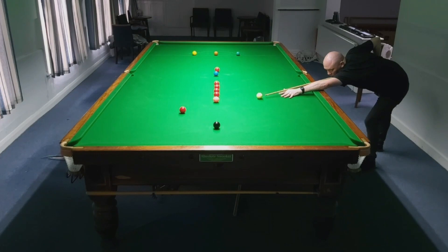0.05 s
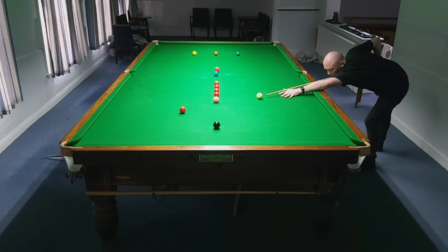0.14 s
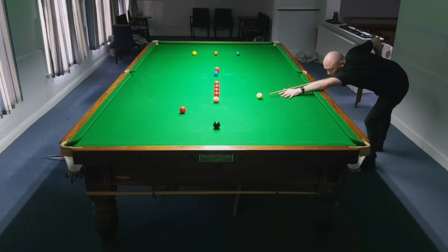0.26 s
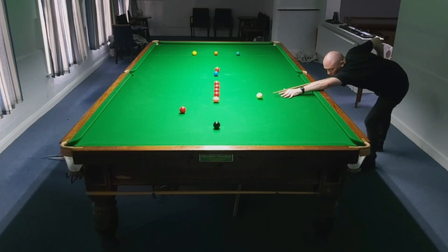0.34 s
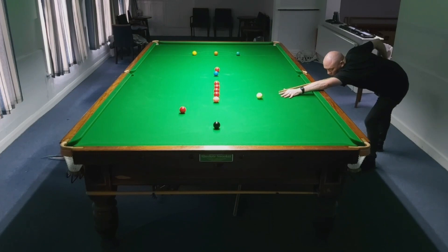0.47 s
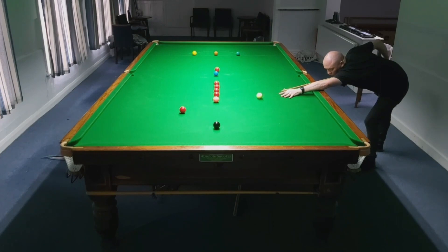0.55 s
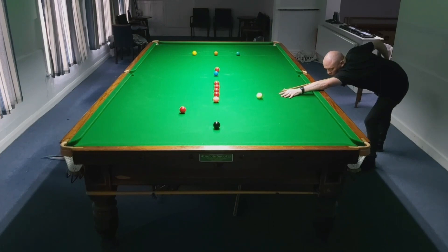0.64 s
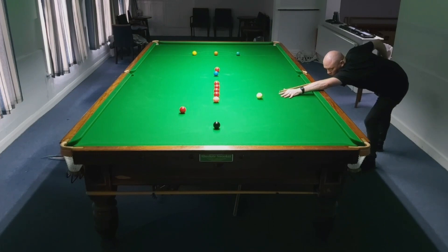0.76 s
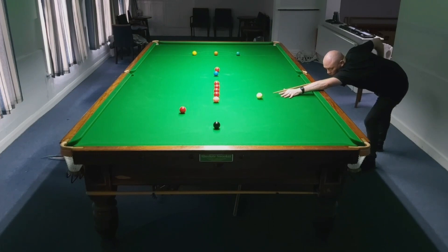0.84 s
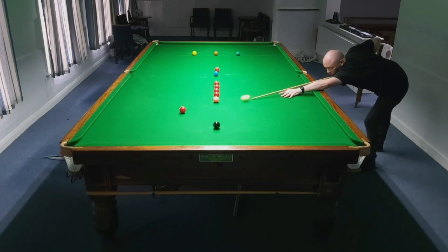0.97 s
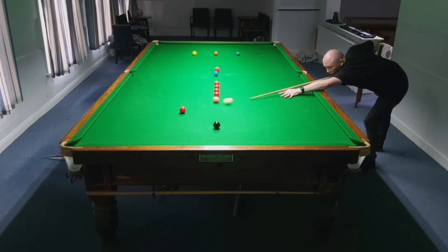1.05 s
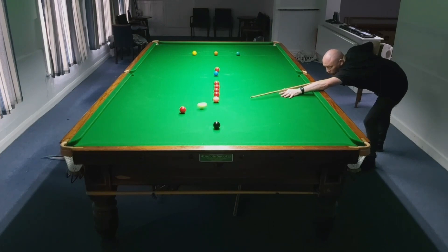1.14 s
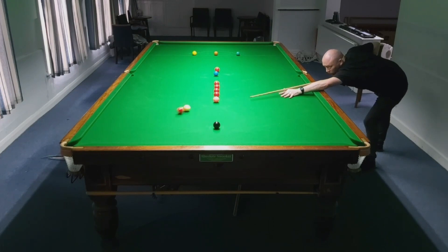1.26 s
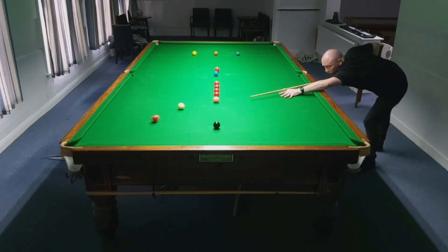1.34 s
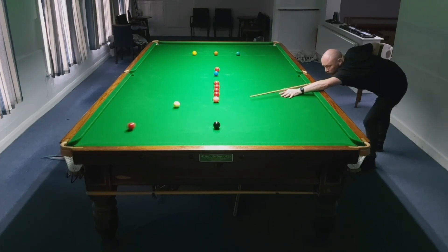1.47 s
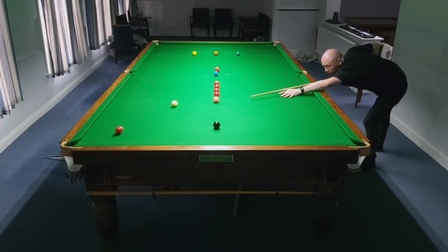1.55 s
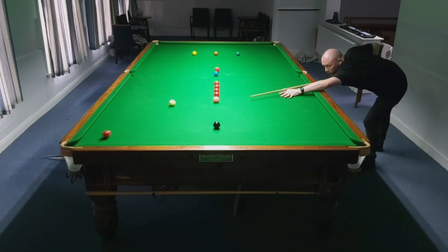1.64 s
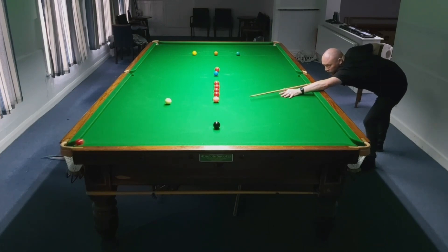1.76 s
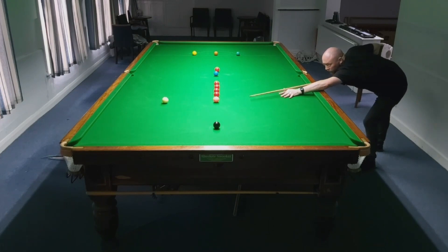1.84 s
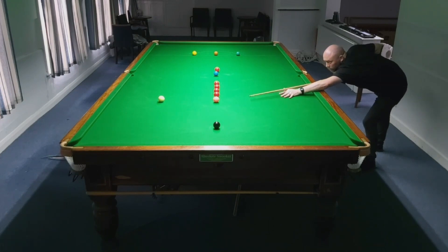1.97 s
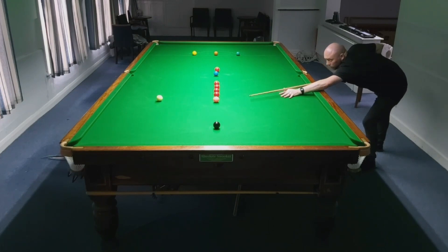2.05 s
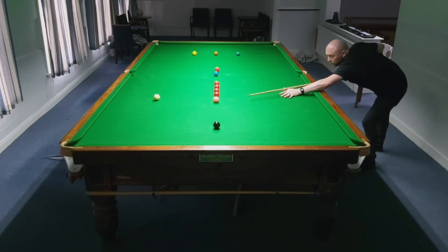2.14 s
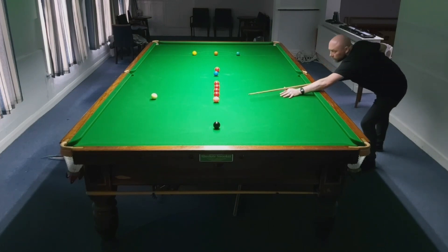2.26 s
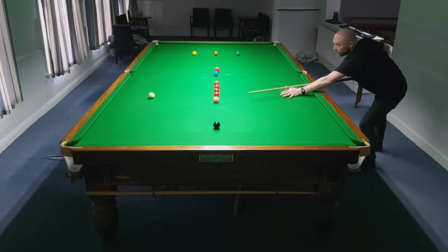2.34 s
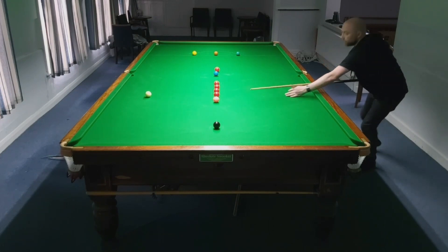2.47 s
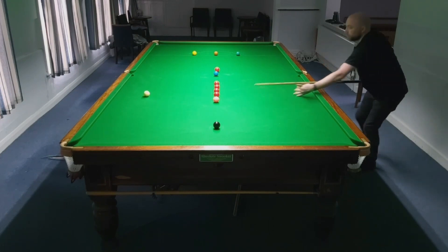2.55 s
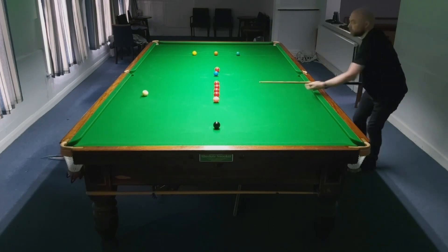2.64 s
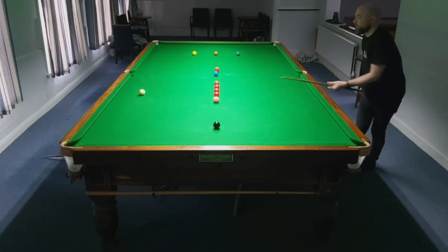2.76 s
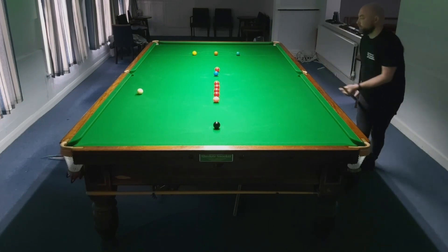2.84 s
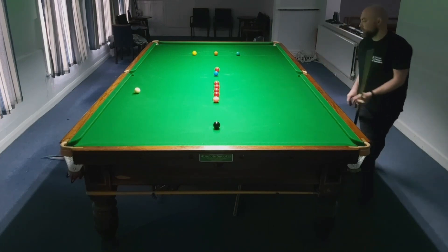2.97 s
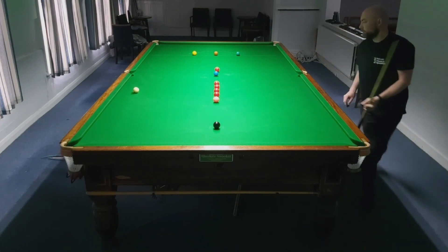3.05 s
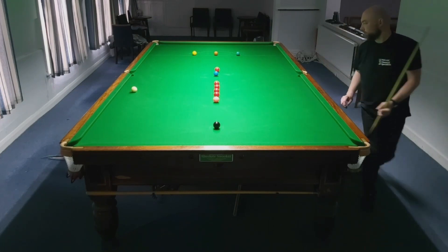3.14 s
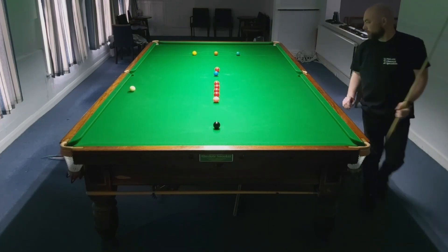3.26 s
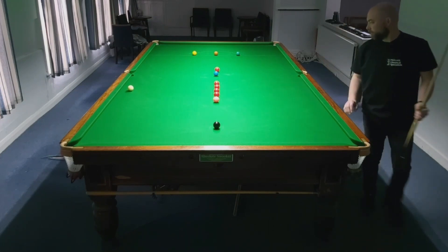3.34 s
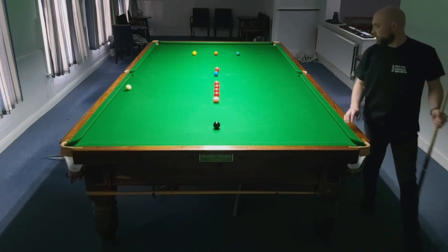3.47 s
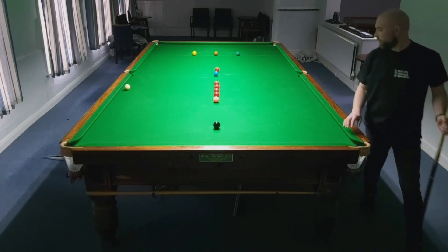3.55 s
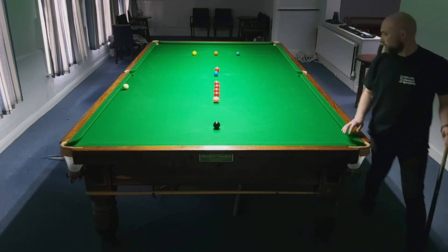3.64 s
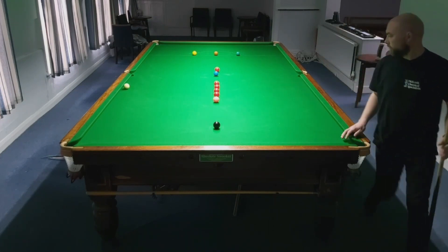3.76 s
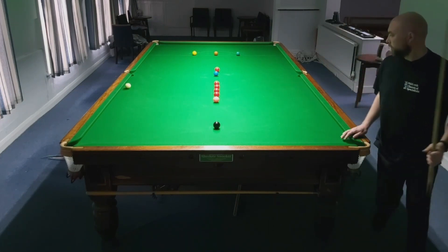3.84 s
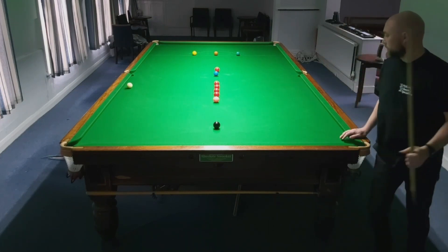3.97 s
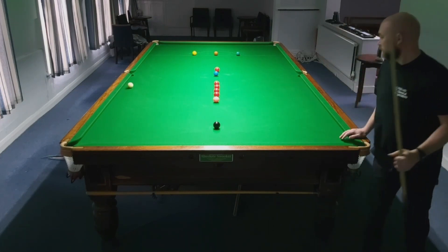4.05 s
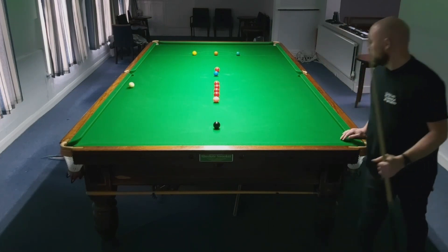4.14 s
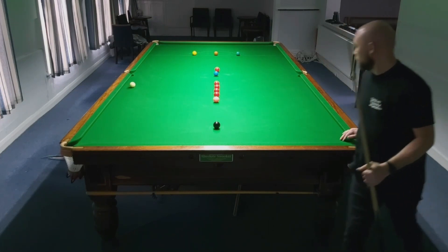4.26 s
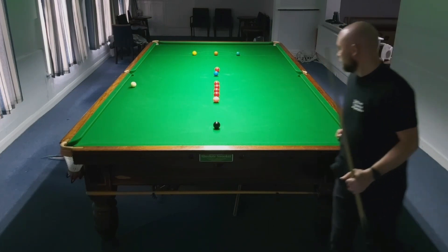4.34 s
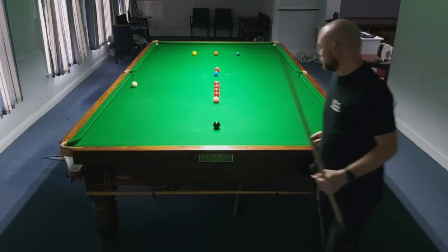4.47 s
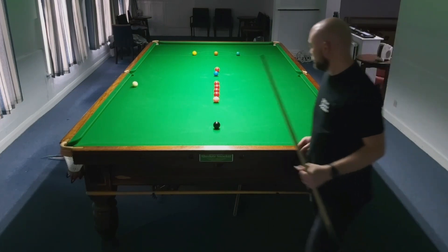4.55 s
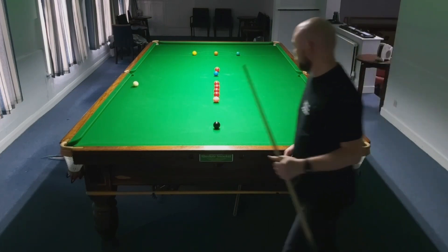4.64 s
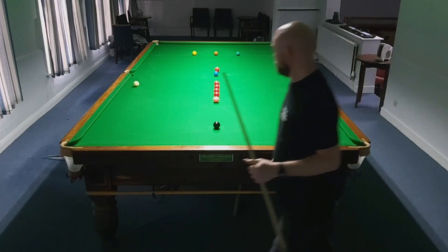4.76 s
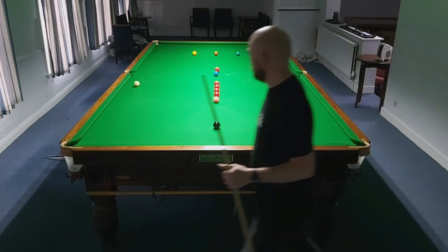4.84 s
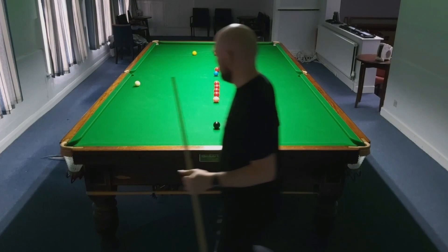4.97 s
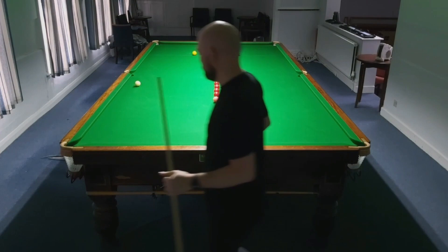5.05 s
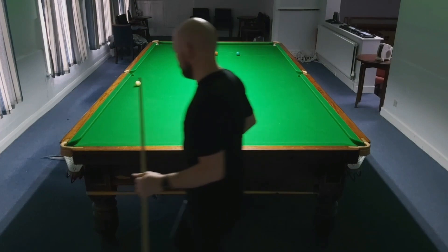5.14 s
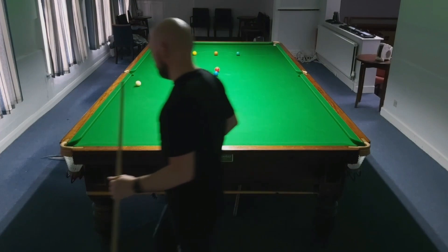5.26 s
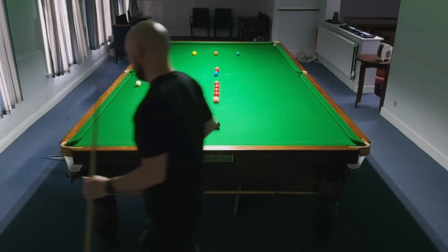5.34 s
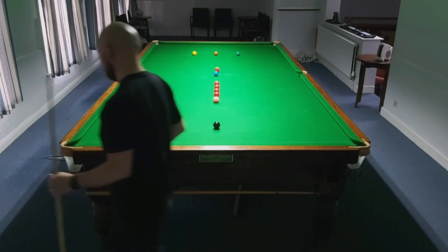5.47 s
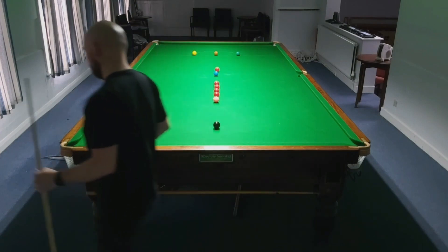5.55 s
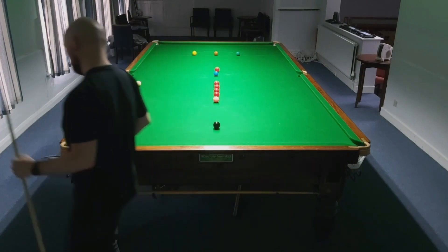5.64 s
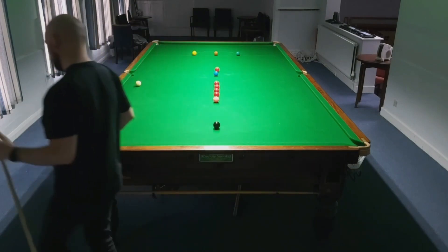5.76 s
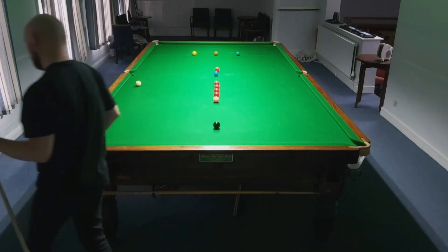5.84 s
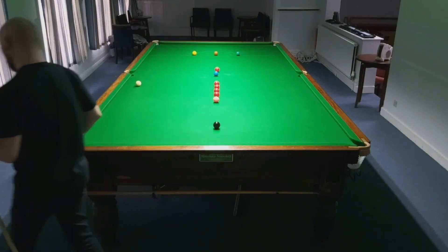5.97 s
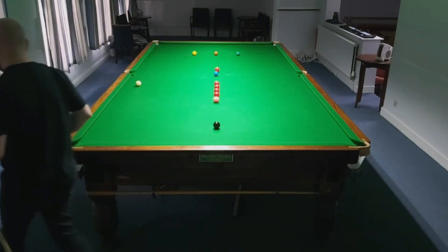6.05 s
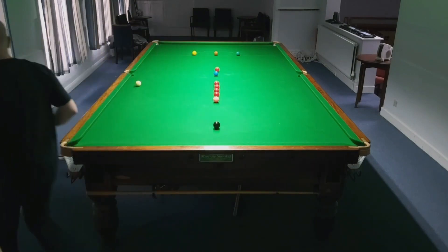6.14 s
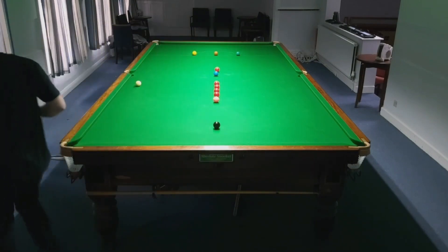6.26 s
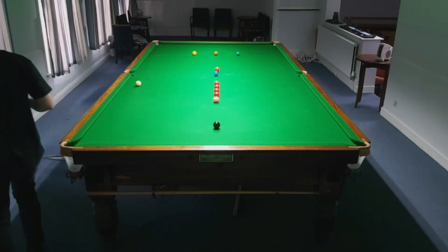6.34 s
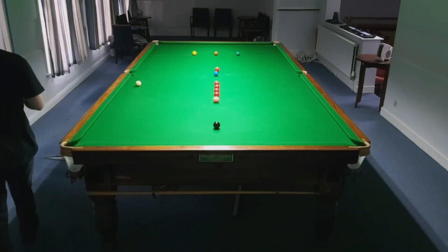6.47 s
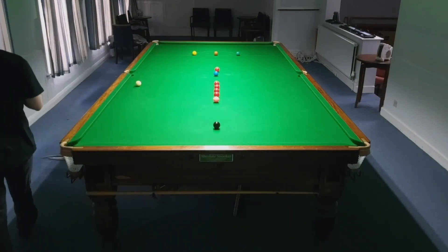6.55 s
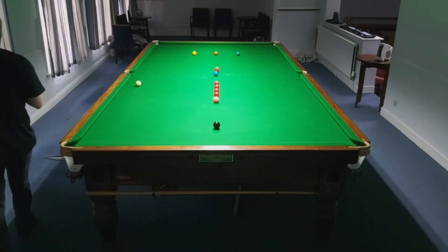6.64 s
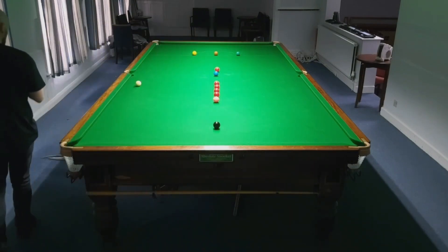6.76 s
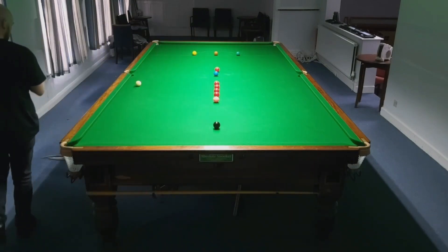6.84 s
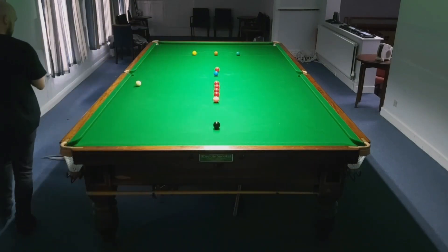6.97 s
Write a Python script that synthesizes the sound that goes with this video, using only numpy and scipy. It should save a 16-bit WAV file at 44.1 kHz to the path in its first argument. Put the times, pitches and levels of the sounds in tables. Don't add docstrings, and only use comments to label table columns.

```python
import sys
import numpy as np
from scipy import signal
from scipy.fft import rfft, irfft, next_fast_len
from scipy.io import wavfile
from scipy.ndimage import uniform_filter1d, minimum_filter1d, map_coordinates

SR = 44100
rng = np.random.default_rng(int(sys.argv[2]) if len(sys.argv) > 2 else 0)


def file_out(sig):
    cols = np.atleast_2d(sig).T
    lim = np.clip(cols, -1, 1)
    pcm = np.round(lim * 32767).astype(np.int16)
    wavfile.write(sys.argv[1], SR, pcm)


def invert_db(x):
    u = np.asarray(x, float) / 20
    return 10 ** u


N = 308690
SPAN = 32768
HZ = np.fft.rfftfreq(SPAN, 1 / SR)
SLOW_S, WALK_S = 1.1, 2.5

# start in seconds, peak level in dB, treble in dB.
CLACKS = [(1.0601, 0, 14), (1.0628, -9, 2), (1.0652, -10, 9), (1.0679, -1, 9), (1.0703, -3, 7),
          (1.0821, -4, 2), (1.0942, -2, -8), (1.1759, 0, 0), (1.1772, -8, 10), (1.1934, -3, -8),
          (1.1957, -1, -8), (2.2338, -16, -10)]
# time in seconds, level in dB, treble in dB.
CLACK_ROOM = [
    (1.068, 4, 2.5),
    (1.184, 7, -2),
    (2.2312, -21.5, 2),
]
# frequency in Hz, level in dB per Hz.
BALL = [(180, -43), (300, -15.5), (600, -19.5), (900, -17.5), (1200, -6), (2400, 5.5), (3500, -1),
        (5000, -18.5), (6200, -29.5), (10800, -35.5), (15500, -39)]
LOBE_HZ, LOBE_DB = 3130, 2.5
FAST_LOBE_HZ, FAST_LOBE_DB = 5750, 9.5


def ball_pulses(s, db, treble_db, fast_db):
    fast_or_slow = np.where(s > SLOW_S, [[LOBE_HZ], [LOBE_DB]], [[FAST_LOBE_HZ], [fast_db]])
    null_hz, depth_db = fast_or_slow[..., None]
    lobes = -depth_db * np.cos(2 * np.pi * HZ / null_hz) * np.clip(HZ / null_hz - 1, 0, 1)
    treble = treble_db[:, None] * along([(4500, 0), (6500, 1), (14000, 1)], HZ)
    pulse = causal(along(BALL, HZ) + lobes + treble)
    peak = np.abs(irfft(pulse)).max(axis=1, keepdims=True)
    return pulse / peak * invert_db(db)[:, None]


def clacks():
    s, db, treble_db = np.transpose(CLACKS)
    sharp = placed(s, ball_pulses(s, db, treble_db, FAST_LOBE_DB), 0 * s - 60, onset=0.001)
    s, db, treble_db = np.transpose(CLACK_ROOM)
    tail = placed(s - 0.022, ball_pulses(s, db - 60, treble_db, 0), 60 + 0 * s, onset=0.026)
    return sharp + tail


# start in seconds, peak level in dB, pitch in
# Hz.
CLACK_RINGS = [(1.0604, -3, 2750), (1.0660, -11, 2500), (1.0672, -10, 3300), (1.0686, -4, 2500),
               (1.0710, -6, 2400), (1.0805, -12, 2700), (1.0830, -12, 2900), (1.0882, -12, 2800),
               (1.0908, -12, 2800), (1.0965, -12, 2000), (1.1025, -12, 2600), (1.1108, -11, 2600),
               (1.1780, -9, 2600), (1.1800, -13, 2900), (1.1822, -6, 2500), (1.1845, -12, 2400),
               (1.1872, -10, 2800), (1.1918, -10, 2800), (1.1943, -8, 2800), (1.1980, -9, 1900),
               (1.2000, -8, 2300), (1.2073, -9, 2400), (1.2193, -11, 2500)]


def rings():
    cycles = 2.2
    return pings([(*row, cycles) for row in CLACK_RINGS], size=1024)


# frequency in Hz, width in Hz, level in dB.
CUE = [(1645, 60, -1), (2770, 120, 3), (3680, 310, -1.5), (4420, 240, -3.5), (4950, 160, -4.5),
       (5800, 220, -5.5), (6900, 220, -6), (8080, 250, -7.5), (10500, 1200, -13)]
# start in seconds, level in dB, room in dB.
CUE_HITS = [
    (.786, -1.5, 4),
    (.8738, 11.5, -3.5),
]


def cue():
    return struck(CUE_HITS, resonances(CUE) ** 2, swell=0.002, t60=0.02)


# start in seconds, peak level in dB, pitch in Hz, room in dB.
TABLE_THUDS = [(0.787, -25.5, 210, 2), (0.799, -17.5, 437, -2), (0.879, -13, 348, -1.5),
               (0.949, -20, 290, 9.5), (1.04, -17.5, 182, 0.5), (1.538, -20.5, 450, -13),
               (1.5483, -9, 368, -6.5), (1.5538, -3, 363, 0), (1.584, -11, 402, -5.5),
               (1.609, -9.5, 378, 0.5), (1.662, -17.5, 285, -1.5), (1.97, -19.5, 242, -3)]
HEELS = [(0.018, -35, 88, 1.5), (0.049, -31.5, 119, -17), (2.82, -32.5, 173, 0), (2.97, -34.5, 322, 0),
         (3.334, -32.5, 127.8, -5), (3.435, -17.5, 181, -6), (3.664, -30, 374, -15),
         (3.964, -38.5, 107.3, -5), (4.05, -18, 133, -27), (4.137, -19, 163, 0), (4.198, -23.5, 262, -26),
         (4.407, -25, 120, -26), (4.425, -17, 298, -28), (4.541, -21.5, 140, -1), (4.642, -25, 98, -22),
         (4.66, -16.5, 142, -3.5), (4.717, -41, 125, -12), (4.818, -32, 206, -1), (4.974, -28.5, 142, 2),
         (5.123, -12, 270, -1), (5.246, -23, 140, -6), (5.337, -36, 302, -13), (5.722, -22.5, 103, -17),
         (5.836, -22, 178, 2), (5.874, -16.5, 304, 1), (6.436, -17, 326, -6.5), (6.45, -21.5, 160, -12),
         (6.754, -30, 300, 2)]


def thuds():
    s, db, hz, room_db = np.transpose(TABLE_THUDS + HEELS)[..., None]
    cycles = np.arange(SPAN) / SR * hz
    push = np.sin(2 * np.pi * cycles) * (1 - np.exp(-cycles / 0.34)) * np.exp(-cycles / 1.28)
    radiation = (1j * HZ / (0.46 * hz + 1j * HZ)) ** 2
    return placed(s[:, 0] + 0.003, rfft(push) * radiation * invert_db(db + 4), room_db[:, 0] - 1.5, onset=0.0081)


# start in seconds, peak level in dB, low end in dB, hardness in dB, room in dB.
RAIL_KNOCKS = [(0.7883, -13, 0.5, -14, -7.5), (0.7926, -22.5, -15, 1, -6), (1.662, -32.5, -5, -2.5, -3.5),
               (1.7885, -32.5, -21, 0.5, 10.5), (1.8908, -37.5, -2.5, 0.5, 9), (2.3165, -32.5, -9, -9, 5.5)]
STEP_KNOCKS = [(3.593, -40, -5, -1.5, 0), (4.14, -25.5, 2, -11.5, -0.5), (4.2072, -27, -7, 0, -4),
               (4.307, -25.5, -12, -8.5, 4.5), (4.314, -36, -17, -21, 7), (4.3342, -24, -3, -4, -17),
               (4.3481, -25.5, -5, -1, -4.5), (4.36, -29, -3, -6, -23), (4.412, -20, -3, -12, -24),
               (4.5427, -27, -9, -6.5, -1), (4.697, -27, -5, -11, -6.5), (4.819, -22, -6, -13, -2.5),
               (4.844, -27, -6, -41, 2), (4.8757, -31.5, -1.5, -5.5, -2.5), (4.977, -24.5, -22, -7.5, -4.5),
               (5.4773, -22.5, -28.5, -21, -4.5), (5.5232, -32, -12, -10, -2.5),
               (5.6238, -27, -6, -26, -10), (5.7113, -26, 5.5, -13, -4.5), (5.856, -26.5, -5, -23, -16),
               (5.891, -23, -12, -17.5, -2.5), (6.436, -23, -3.5, -20, -2), (6.756, -31, -6, -24, 5)]
TABLE_SCUFFS = [(0.7854, -20.5, -11.5, -15, 3.5), (0.876, -15.5, -14.5, 0, 4.1), (1.541, -39, 14, -36, 8.5),
                (1.587, -18.5, -1, -43, 2), (1.6052, -18, -6.5, -38, 4), (1.9929, -19, -19, -12.5, 6.6),
                (1.996, -34, -31, 16, 1.9)]
STEP_SCUFFS = [(2.673, -43, -9, -16.5, 2.5), (2.9062, -45.5, -13, -14, 7), (2.96, -67, -5, 5, 21),
               (3.3911, -50.5, -11, -34.5, 0), (3.5571, -48, -3, -8, 5), (3.669, -48.5, 7.5, -14, -4),
               (4.066, -38.5, -5.5, -6.5, 3.5), (4.671, -29.5, -29, -11, -0.5),
               (4.722, -28.5, 2, -5.5, -1.5), (5.1259, -43, -10, 4.5, 6), (5.168, -44, -23, -10, 10),
               (5.268, -37, -17, -16, -4), (5.3191, -51, 3, -6.5, 11), (5.346, -39.5, -3, -12, -2),
               (5.6094, -40, -20, -27, 10), (5.72, -41.5, 8, 3, -3), (6.4266, -34.5, -7, -23.5, -6)]
CHATTER = 8192
TOP_GROWS, TABLE_TOP_DB, FLOOR_TOP_DB = 1.2, -14, -21
AIRY_GROWS, TABLE_AIRY_DB, FLOOR_AIRY_DB = 2.2, -19, -31


def knocks():
    t = np.arange(CHATTER) / SR
    rigid, yielding = RAIL_KNOCKS + STEP_KNOCKS, TABLE_SCUFFS + STEP_SCUFFS
    hard = 0.16 * rng.standard_normal((len(rigid), CHATTER)) * invert_db(-60 * t / 0.063) + (t == 0)
    soft = 0.3 * rng.standard_normal((len(yielding), CHATTER)) * invert_db(-60 * t / 0.046)
    soft = soft * (1 - np.exp(-t / 0.00025))
    hard_top = np.repeat([TABLE_TOP_DB, FLOOR_TOP_DB], [len(RAIL_KNOCKS), len(STEP_KNOCKS)])
    soft_top = np.repeat([TABLE_TOP_DB, FLOOR_TOP_DB], [len(TABLE_SCUFFS), len(STEP_SCUFFS)])
    return contacts(rigid, hard, hard_top) + contacts(yielding, soft, soft_top)


def contacts(rows, force, top_db):
    s, db, low, hardness, room_db = np.transpose(rows)
    airy_db = np.where(s < WALK_S, TABLE_AIRY_DB, FLOOR_AIRY_DB)
    shapes = []
    for a, b, top, airy in zip(low, hardness, top_db, airy_db):
        points = [(50, a - 28), (900, a + 8), (2600, 0.01), (4200, 0.56 * b), (6000, b - 2),
                  (11500, TOP_GROWS * b + top), (16000, AIRY_GROWS * b + top + airy)]
        shapes.append(along(points, HZ))
    colours = causal(np.array(shapes)) * invert_db(db + 13.0)[:, None]
    return placed(s, colours, room_db + 0.5, onset=0.0026, force=rfft(force, SPAN))


# start in seconds, peak level in dB, contact in ms, room in dB.
TAPS = [
    (4.412, -2, 0.12, -5.5),
    (4.4198, -5, 0.12, -11),
    (4.5428, -5, 0.18, -1.5),
    (4.55, -6, 0.14, -33),
]


def taps():
    s, db, ms, room_db = np.transpose(TAPS)[..., None]
    u = np.arange(SPAN) / SR * 1000 / ms - 2
    push = rfft(np.exp(-u ** 2)) * 1j * HZ / (350 + 1j * HZ) * invert_db(db - 5.0)
    return placed(s[:, 0], push, room_db[:, 0], onset=0.0007)


# frequency in Hz, width in Hz, level in dB.
RAIL = [(7400, 900, 0), (11200, 500, -7)]
# start in seconds, level in dB, room in dB.
RAIL_HITS = [
    (1.592, -40, 0),
]
# frequency in Hz, width in Hz, level in dB.
RODS = [(2700, 80, -1), (3400, 110, -2), (4220, 90, -2), (5200, 200, -6)]
# start in seconds, level in dB, room in dB.
ROD_HITS = [
    (2.318, -19.5, 6),
]


def rail():
    hiss = struck(RAIL_HITS, resonances(RAIL) ** 2, swell=0.01, t60=0.15)
    return hiss + struck(ROD_HITS, resonances(RODS) ** 2, swell=0.00097, t60=0.026)


# start in seconds, peak level in dB, pitch in Hz, decay in cycles.
TICKS = [(.793, -22, 7960, 5), (.8745, -13, 2750, 8), (.875, -15.5, 4040, 8.6), (.8915, -19, 9700, 7.6),
         (2.2346, -24.5, 2460, 4.4), (2.511, -48, 701, 2.1), (1.5876, -19.5, 1060, 4.8),
         (1.5915, -27, 1960, 5.5), (1.613, -19.5, 1490, 6.4), (1.7897, -26, 4700, 7.8),
         (1.7905, -36, 6750, 12), (1.8899, -30, 4820, 10), (1.8905, -36, 7040, 10), (1.914, -36, 2000, 6.7),
         (1.9977, -14, 4600, 4.9), (1.999, -25, 6900, 10), (2.115, -30.5, 3140, 3.6),
         (4.0725, -38.5, 4600, 3.6), (4.208, -29.5, 6030, 4.3), (4.3068, -25, 2620, 2.3),
         (4.3145, -37, 2830, 2.7), (4.3143, -35, 7900, 3.3), (4.3345, -24, 3000, 2.8),
         (4.3485, -39, 7450, 4.8), (4.350, -33, 2820, 4), (4.360, -32, 5000, 4), (4.371, -38, 4740, 4.7),
         (4.676, -31, 3080, 3.2), (4.698, -41, 4830, 4), (4.7228, -26.5, 2870, 6.4),
         (4.7235, -28.5, 8400, 2.9), (4.727, -30, 1470, 2.8), (4.7668, -22, 1810, 1.7),
         (4.8205, -29, 1960, 3), (4.8445, -30, 2070, 3.4), (4.9775, -32, 3220, 3), (5.6244, -35, 1480, 3.8),
         (5.628, -33.5, 1900, 4), (5.7112, -25, 1530, 1.5), (5.712, -31, 6050, 4.3),
         (5.845, -34, 1010, 2.2), (5.892, -36.5, 4680, 5.6), (6.428, -43, 3230, 5.3),
         (6.4365, -28.5, 3280, 2.2), (6.532, -31, 3000, 1.2), (6.79, -44.5, 2000, 4.6)]
CLICKS = [(.879, -27, 2723, 100), (.88, -32.5, 4595, 130), (.922, -32.5, 1639, 49),
          (1.585, -21.5, 171.6, 4.4), (1.64, -21.5, 191, 3.8), (2.52, -67, 2700, 60),
          (2.545, -68.5, 3420, 70), (.905, -28, 9700, 8), (1.5445, -25, 447, 1.1), (1.597, -17, 1455, 6),
          (1.6065, -23, 1980, 6.6), (1.634, -22, 1480, 4), (1.651, -27, 1570, 4), (2.912, -46, 2500, 1.5),
          (3.392, -55, 2200, 4.4), (4.3068, -30, 5500, 1.5), (4.3142, -26, 5000, 1.5),
          (4.3218, -36, 4000, 1.5), (4.3372, -31, 2400, 2.3), (4.349, -30, 5000, 2),
          (4.382, -33, 2000, 1.5), (4.7245, -32, 4370, 3), (4.7668, -28, 4200, 1.2),
          (4.8765, -38, 5500, 1.5), (5.822, -22, 152, 1.5), (5.8455, -23, 495, 1.14),
          (5.856, -32, 1490, 1.3), (6.4362, -24, 870, 1.14), (6.443, -22.5, 210, 1.8),
          (6.537, -41, 1500, 4.1), (6.756, -20, 460, 1.04)]


def ticks():
    tick_room_db = -6.5
    direct = pings(TICKS, size=1024) + pings(CLICKS, size=6144) + keys()
    tail = irfft(answers(1, onset=0.0016)[0])
    return direct + invert_db(tick_room_db) * signal.fftconvolve(direct, tail)[:N]


# frequency in Hz, level in dB.
KEYS = [(6360, 0), (6910, -1), (7370, 2), (8190, 2), (8720, -3), (9800, -8), (10540, -3), (11300, -5),
        (11900, -9), (12730, -13), (13340, -17), (14590, -19)]
# start in seconds, level in dB, tilt in dB per octave.
JOLTS = [(5.126, -58, 1), (5.146, -62, 3), (5.165, -56, 10), (5.195, -61, 6), (5.262, -66, -2),
         (5.445, -71, 8), (5.477, -71, 4), (5.527, -64, 2), (5.722, -54, 7), (5.748, -59, 8),
         (5.895, -71, 1)]


def keys():
    t, out = np.arange(4096) / SR, np.zeros(N + SPAN)
    hz, level = np.transpose(KEYS)[..., None]
    t60 = 0.057
    for s, db, tilt in JOLTS:
        luck = rng.standard_normal((2, len(KEYS), 1))
        waver = np.cumsum(rng.standard_normal((len(KEYS), len(t))), axis=1) * 0.09
        ring_db = db + level + tilt * np.log2(hz / 8000) + 3 * luck[0] - 60 * t / t60
        ring = invert_db(ring_db) * np.sin(2 * np.pi * hz * (1 + 0.01 * luck[1]) * t + waver)
        out[round(s * SR):][:len(t)] += ring.sum(0) * (1 - np.exp(-t / 0.0026))
    return out[:N]


# start in seconds, hold in seconds, rumble in dB, scrape in dB over the rumble.
STROKES = [(0, 0.012, -58.5, -48), (0.901, 0.01, -29, 0.5), (1.009, 0.17, -31, -9),
           (1.245, 0.12, -40.5, -22.5), (1.704, 0.022, -37.5, -12), (1.828, 0.053, -37.5, -16),
           (2.017, 0.0086, -33.5, -25), (2.161, 0.11, -44, -3.5), (2.858, 0.033, -53, -6),
           (2.943, .06, -61, -7), (3.056, 0.041, -63.5, 2), (3.478, 0.033, -48, -9),
           (3.607, 0.075, -40, -24), (4.008, 0.07, -56, -3.5), (4.149, 0.014, -28.5, -34),
           (4.338, 0.093, -37.5, -6.5), (4.496, 0.081, -39, -25), (4.706, 0.11, -29.5, -17.5),
           (4.916, 0.17, -42.5, -5.5), (5.33, 0.034, -37, -14), (5.52, 0.024, -40.5, -9),
           (5.71, 0.011, -31.5, -7.5), (5.86, 0.046, -34, -18.5), (6.054, 0.054, -38, -25),
           (6.236, 0.079, -46.5, -18), (6.46, 0.034, -35, -26), (6.54, 0.15, -42.5, -13),
           (6.915, 0.095, -46, -22)]
# frequency in Hz, level in dB per Hz.
ROLL = [(50, -28.5), (90, -8), (160, -0.5), (300, -1.5), (400, -8), (700, -22.5), (910, -60), (1540, -120)]
# frequency in Hz, level in dB per Hz.
BOARDS = [(35, -31), (60, 0.5), (123, -2), (156, 0), (258, -6.5), (301, 1), (352, -9), (700, -19.5),
          (910, -67), (1540, -120)]
# frequency in Hz, level in dB per Hz.
SOLES = [(290, -29.5), (500, -6.5), (547, -9.5), (754, -13.5), (2080, -19), (3470, -24.5), (5500, -35.5),
         (7150, -67), (12100, -120)]
REST_DB = [-63, -58, -73.5, -85]


def strokes():
    s, hold, db, scrape_db = np.transpose(STROKES)
    roll = patchy(ROLL, 3) * swells(s, hold, db - 60 * (s > WALK_S), -73, quick=1.05)
    boards = patchy(BOARDS, 3) * swells(s, hold, db - 60 * (s < WALK_S), REST_DB[1], quick=1.12)
    soles = gritty(patchy(SOLES, 2.5)) * swells(s, hold, db + scrape_db, REST_DB[2], quick=0.79)
    return roll + boards + soles


# start in seconds, hold in seconds, level in dB.
SWISHES = [(.96, 0.018, -64), (2.044, 0.0088, -67), (2.391, 0.0061, -59), (2.893, 0.12, -70.5),
           (4.398, .01, -55), (4.477, 0.11, -68), (4.963, 0.0097, -59), (5.22, 0.0088, -58.5),
           (5.747, 0.0075, -60), (5.91, 0.013, -60.5), (6.006, 0.0081, -68.5)]
# frequency in Hz, level in dB per Hz.
CLOTH = [(3500, -27), (4500, 3), (7400, -5.5), (11000, -14.5), (12500, -25), (15500, -51)]


def swishes():
    return gritty(patchy(CLOTH, 2.5)) * swells(*np.transpose(SWISHES), REST_DB[3], quick=1.5)


# start in seconds, hold in seconds, level in dB.
SHOVES = [(0.077, .01, -49), (1.035, 0.017, -42.5), (1.227, 0.0043, -40), (1.696, 0.038, -44),
          (1.974, 0.0088, -40.5), (2.133, 0.015, -42.5), (2.35, 0.053, -50), (2.871, 0.083, -53),
          (3.478, 0.11, -52.5), (3.973, 0.24, -48.5), (4.5, 0.25, -43), (5.134, 0.05, -38.5),
          (5.233, 0.032, -37), (5.45, 0.029, -41.5), (5.818, 0.018, -44), (6.573, 0.059, -48.5)]
# frequency in Hz, level in dB per Hz.
AIR = [(15, -19), (30, 15.5), (60, 2.5), (110, 0), (160, -43.5)]


def shoves():
    return patchy(AIR, 3) * swells(*np.transpose(SHOVES), REST_DB[0], quick=1.3)


def gritty(noise):
    catch = unit(signal.fftconvolve(rng.standard_normal(N), np.hanning(180), "same"))
    return unit(noise * invert_db(2.5 * catch))


def swells(s, hold, db, rest_db, quick):
    rise, fall = 153, 106
    t = np.arange(0, N + 128, 128)[:, None] / SR
    down = rise * np.maximum(s - t, 0) + fall * np.maximum(t - s - hold, 0)
    power = np.sum(invert_db(db - quick * down) ** 2, axis=1) + invert_db(rest_db) ** 2
    return np.interp(np.arange(N) / SR, t[:, 0], np.sqrt(power))


def patchy(spectrum, patchy_db):
    hz, _, z = signal.stft(rng.standard_normal(N), SR, nperseg=1024)
    field = uniform_filter1d(rng.standard_normal(z.shape), size=8, axis=0)
    field = uniform_filter1d(field, size=4, axis=1)
    gain = invert_db(along(spectrum, hz)[:, None] + patchy_db * field / field.std())
    return unit(signal.istft(z * gain, nperseg=1024)[1][:N])


def pings(rows, size):
    s, db, hz, life = np.transpose(rows)[..., None]
    cycles = np.arange(size) / SR * hz
    rough = 1 + 0.71 * uniform_filter1d(rng.standard_normal(cycles.shape), size=40, axis=1)
    envelope = (1 - np.exp(-cycles / 0.5001)) ** 2 * np.exp(-cycles / life)
    waves = invert_db(db + 3.0) * rough * np.sin(2 * np.pi * cycles) * envelope
    out = np.zeros(N + SPAN)
    for at, wave in zip(s[:, 0], waves):
        out[round(at * SR):][:size] += wave
    return out[:N]


def struck(hits, response, swell, t60):
    s, db, room_db = np.transpose(hits)
    t = np.arange(SPAN) / SR
    force = rng.standard_normal((len(s), SPAN)) * invert_db(-60 * t / t60) * (1 - np.exp(-t / swell))
    return placed(s, response * invert_db(db)[:, None], room_db, onset=0.015, force=rfft(force))


def resonances(modes):
    total = 0
    for k, (centre, width, db) in enumerate(modes):
        damping = 1j * HZ * width
        total = total + (-1) ** k * invert_db(db) * damping / (centre * centre - HZ * HZ + damping)
    return total


def placed(times, colours, room_db, onset, force=1):
    size = np.sqrt(np.mean(np.abs(force) ** 2 + 0 * HZ, axis=-1, keepdims=True))
    room = size * invert_db(room_db)[:, None] * answers(len(times), onset)
    heard = irfft(colours * (force + room), SPAN)
    out = np.zeros(N + SPAN)
    for s, blow in zip(times, heard):
        out[round(s * SR):][:SPAN - 2048] += blow[:-2048]
    return out[:N]


# frequency in Hz, t60 in seconds.
ROOM = [(100, 0.93), (300, 0.46), (1000, 0.65), (2500, 0.5), (5000, 0.41), (9000, 0.28), (14000, 0.26)]


def answers(count, onset):
    t = np.arange(SPAN) / SR
    density = np.clip(0.04 + (t / 0.04) ** 2, 0, 1)
    noise = rng.standard_normal((count, SPAN))
    noise = noise * (rng.random((count, SPAN)) < density) / np.sqrt(density)
    hz, s, z = signal.stft(noise, SR, nperseg=256)
    decay = invert_db(-60 * s / along(ROOM, hz)[:, None])
    tail = signal.istft(z * decay, SR, nperseg=256)[1][:, :SPAN]
    tail = tail * np.clip((t - onset) / 0.0024, 0, 1)
    where = np.meshgrid(np.arange(count), HZ / 250, indexing="ij")
    grain = map_coordinates(rng.standard_normal((count, 90)), where, order=1)
    return rfft(tail / np.linalg.norm(tail, axis=1, keepdims=True)) * invert_db(1.6 * grain - 0.2)


def causal(db):
    c = irfft(np.log(invert_db(db) + 1e-7), SPAN)
    c[..., 1:SPAN // 2] *= 2
    c[..., SPAN // 2 + 1:] = 0
    return np.exp(rfft(c))


def along(points, hz):
    f, v = np.transpose(points)
    return np.interp(np.log(hz + 1), np.log(f + 1), v)


def unit(x):
    return x / np.sqrt(np.mean(x ** 2, axis=-1, keepdims=True) + 1e-20)


def scene():
    shot = clacks() + rings() + cue() + thuds() + knocks()
    small = taps() + rail() + ticks()
    return (shot + small + strokes() + swishes() + shoves())[None]


# frequency in Hz, level in dB.
MIC = [(5000, 0.5), (6100, -1), (7400, 4), (8600, 2.5), (9500, -1), (10800, 5.5), (12500, -3.5),
       (15600, -2.5), (15900, -28.5), (17000, -46.5)]


def microphone(dry):
    hiss_db = -85.5
    m = next_fast_len(N + SPAN)
    colour = np.interp(np.fft.rfftfreq(m, 1 / SR), HZ, along(MIC, HZ))
    noisy = dry + invert_db(hiss_db) * rng.standard_normal(N)
    return irfft(rfft(noisy, m) * invert_db(colour), m)[:, :N]


# opening in seconds, start of closing in seconds,
# gain crept up by then in dB, closing rate in dB per second.
GATE = [(0, 0.12, -9.5, 159), (0.783, 2.37, -2, 69), (2.657, 3.113, 5.5, 83), (3.322, 3.785, 4.5, 56.5),
        (3.927, 6.997, 3.5, 82)]


def gate():
    shut_db, open_s = -55, 0.004
    t, db = np.arange(N) / SR, np.zeros(N)
    for opens, closes, lift_db, db_per_s in GATE:
        creep = lift_db * np.minimum((t - opens) / (closes - opens), 1)
        now = creep - db_per_s * np.maximum(t - closes, 0)
        db = np.where(t >= opens, now, db)
    return invert_db(uniform_filter1d(np.maximum(db, shut_db), size=round(open_s * SR)))


def limited(x):
    need = minimum_filter1d(0.985 / np.maximum(np.abs(x), 0.985), size=89)
    return x * uniform_filter1d(need, size=45)


def low_pass(x):
    return signal.sosfilt(signal.butter(12, 17070, fs=SR, output="sos"), x)


def record(dry):
    gated = microphone(dry) * gate()
    return low_pass(limited(gated))


dry = scene()
out = record(dry)
file_out(out)
```